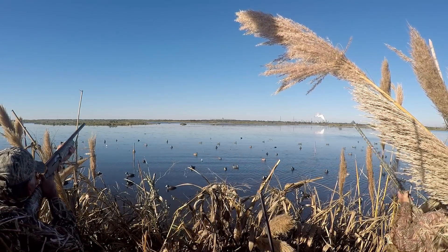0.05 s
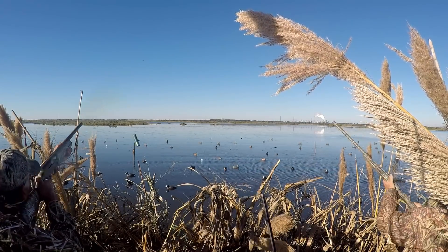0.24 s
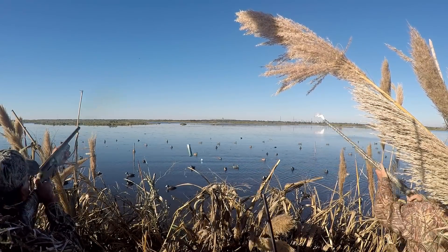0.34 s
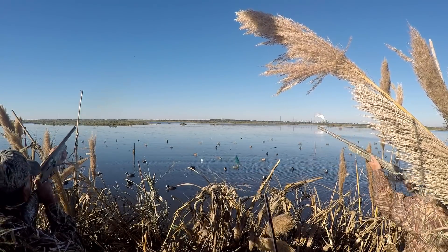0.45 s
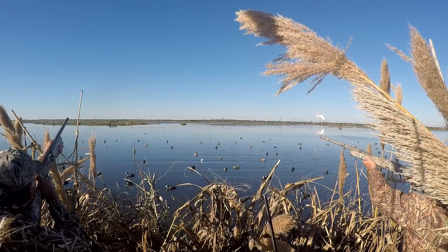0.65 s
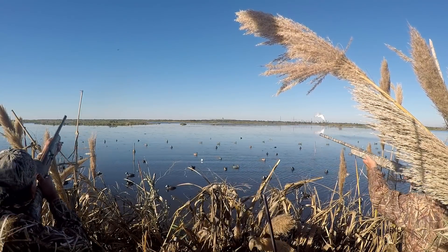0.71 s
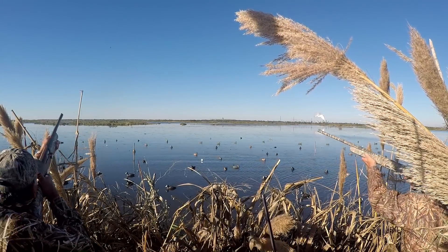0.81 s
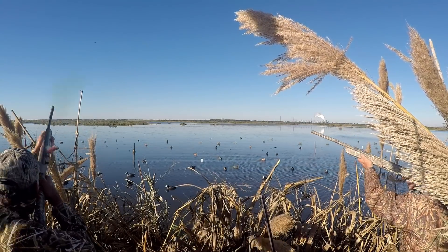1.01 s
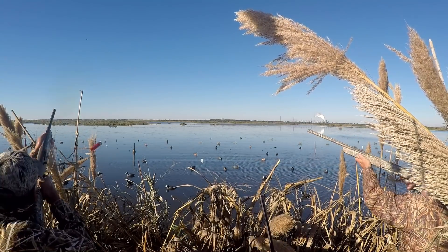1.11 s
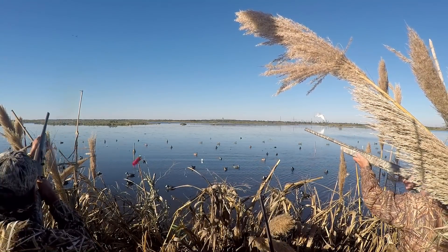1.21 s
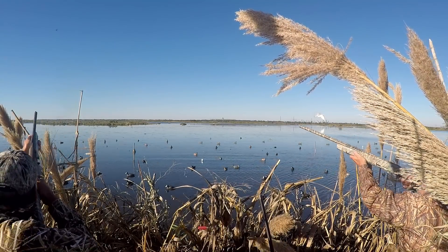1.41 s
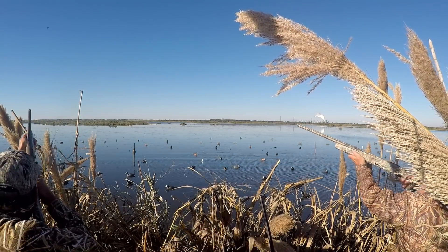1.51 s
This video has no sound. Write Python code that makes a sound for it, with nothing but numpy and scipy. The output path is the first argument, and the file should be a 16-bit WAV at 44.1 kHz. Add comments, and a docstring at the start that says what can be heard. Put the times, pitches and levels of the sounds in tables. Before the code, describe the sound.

Two shotgun blasts, close and overloading a small housed microphone in marsh reeds. Wind rumble and faint rustle open; at 0.2 s the first sharp crack hits with a short hollow boom and scattered tail. Metallic action clacks rattle at 0.26-0.33 s. Quiet rustle and small knocks lead to the second blast at 1.05 s, a clack and knocks at 1.11-1.18 s, a fading far-bank echo, and a light knock at 1.54 s.

```python
"""Among reeds at the edge of open water, two shotgun blasts go off close to a small camera.
Each is a burst of noise with a forerunner, ringing boom in the housing, one slow low-frequency swing as
the input recovers and fading scatter off reeds, water and far banks; the loud fronts overload the input.
Gun actions clack as short noise bursts, knocks and scrapes are resonant noise, and slow and quick random
level curves shape the wind rumble on the microphone port and the rustle of the reeds."""
import sys
import numpy as np
from scipy import signal
from scipy.fft import rfft, irfft, next_fast_len
from scipy.io import wavfile
from scipy.ndimage import map_coordinates

SR = 44100
rng = np.random.default_rng(int(sys.argv[2]) if len(sys.argv) > 2 else 0)


def inscribe(sig):
    """Save sig as 16-bit PCM at rate SR to the path in sys.argv[1].

    A 1-D sig is mono; a 2-D sig holds one channel per row.
    Samples are clipped to [-1, 1] before scaling.
    """
    pcm = np.round(np.clip(np.atleast_2d(sig).T, -1, 1) * 32767)
    wavfile.write(sys.argv[1], SR, pcm.astype(np.int16))


def ratio(d):
    """dB to gain"""
    e = np.asarray(d, float) / 20
    return 10 ** e


N = 68355  # samples


def unit(x):
    """Scales x to rms 1."""
    return x / np.sqrt(np.mean(x ** 2) + 1e-20)


def along(points, hz):
    """Reads (hz, value) points on a log frequency axis."""
    point_hz, value = np.transpose(points)
    return np.interp(np.log(hz + 1), np.log(point_hz + 1), value)


def curve(tables):
    """One value per sample from joined (time_s, value) tables."""
    time_s, value = np.transpose(np.concatenate(tables))
    return np.interp(np.arange(N) / SR, time_s, value)


def wobble(rate):
    """A smooth random curve through rate normal knots a second."""
    knots = rng.standard_normal(int(N * rate / SR) + 4)
    return map_coordinates(knots, [np.arange(N) * rate / SR])


def filtered(x, response):
    """Multiplies the spectrum of x by a response of frequency in Hz."""
    m = next_fast_len(N + 8192)
    return irfft(rfft(x, m) * response(np.fft.rfftfreq(m, 1 / SR)), m)[..., :N]


def noise(spectrum):
    """Coloured noise of rms 1 from (hz, relative dB per Hz) points."""
    return unit(filtered(rng.standard_normal(N), lambda hz: ratio(along(spectrum, hz))))


def since(s):
    """Seconds after s, zero before."""
    return np.maximum(np.arange(N) / SR - s, 0)


def shape(s, rise, hold, t60):
    """Exponential rise from s; a 60 dB per t60 decay sets in after hold (all in seconds)."""
    return (1 - np.exp(-since(s) / abs(rise))) * ratio(-60 * since(s + hold) / t60)


def wind():
    """Wind on the microphone port: low rumble in slow lumps."""
    # level of the wind rumble as heard, lower after the first blast: time_s, level_db
    wind_levels = [
        [(0, -32), (.03, -34.5), (.06, -39), (.12, -41.5), (.15, -39), (.172, -26.5), (.195, -38.5)],
        [(.27, -46), (.33, -50.5), (.45, -54.5), (.52, -48.5), (.6, -50.5), (.94, -49), (1.02, -39.5)],
        [(1.12, -41), (1.2, -52), (1.3, -44), (1.45, -50), (1.525, -42), (1.55, -48.5)],
    ]
    # colour of the rumble: hz, relative_db_per_hz
    rumble_colour = [(12, -37), (20, -1.5), (41, -0.5), (111, -14), (195, -29), (232, -29), (500, -38),
                     (650, -63.5), (1100, -120)]
    lumpy = unit(ratio(1.5 * wobble(14)) * noise(rumble_colour))
    return ratio(curve(wind_levels)) * lumpy


def reeds():
    """Reeds around the microphone: rustling noise broken into small crackles."""
    # level of the rustle as heard: time_s, level_db (before a common lift of 1.5 dB)
    rustle_levels = [
        [(0, -68), (.03, -69), (.06, -65), (.19, -66), (.4, -72)],
        [(.45, -73), (.52, -82), (.59, -81), (.635, -69), (.655, -79), (.69, -66), (.73, -77), (.79, -70),
         (.846, -68), (.89, -75), (.915, -66), (1.02, -67)],
        [(1.3, -69), (1.334, -76), (1.352, -64), (1.37, -74), (1.43, -68), (1.53, -71)],
    ]
    # colour of the rustle: hz, relative_db_per_hz
    reed_colour = [(180, -39), (300, -9), (424, -3), (640, -14), (742, -11), (1120, -2), (1220, -9.5),
                   (6300, -11), (8900, -19.5), (15300, -28)]
    crackle = ratio(1.5 * wobble(40) + 1.5 * wobble(300))
    return ratio(curve(rustle_levels) + 1.5) * unit(crackle * noise(reed_colour))


def knocks():
    """Dull knocks and scrapes: noise through a squared resonance, risen and damped."""
    # start_s, level_db, centre_hz, width_hz (of the resonance before squaring), rise_s, t60_s
    knock_events = [(0.618, -57, 450, 900, 0.0039, 0.031), (.668, -62.5, 2750, 1200, 0.024, 0.18),
                    (.951, -53.5, 2680, 1486, 0.003, 0.091), (0.952, -53.5, 561, 900, 0.023, 0.56),
                    (.983, -47.5, 690, 239.4, 0.017, 0.17), (1.001, -41, 347, 166, .012, .15),
                    (1.117, -31, 190, 110, 0.0034, 0.04), (1.129, -38.5, 700, 990, 0.0095, 0.11),
                    (1.152, -37.5, 197, 111, .004, .06), (1.541, -50.5, 2794, 698, 0.00074, 0.037),
                    (1.539, -45.5, 5990, 3500, 0.001002, 0.05), (1.544, -36.5, 441, 201.7, 0.0053, 0.1)]
    mix = np.zeros(N)
    for start_s, level_db, centre_hz, width_hz, rise_s, t60_s in knock_events:
        def resonance(hz):
            return (hz * width_hz / np.hypot(centre_hz ** 2 - hz ** 2, hz * width_hz)) ** 2
        body = unit(filtered(rng.standard_normal(N), resonance))
        mix += ratio(level_db) * body * shape(start_s, rise_s, rise_s, t60_s)
    return mix


def gun_actions():
    """Metal of the gun actions: each clack is a sharp, quickly damped burst of coloured noise."""
    # clacks: start_s, level_db, t60_s
    clack_events = [(0.156, -54, 0.042), (0.263, -31.5, 0.025), (0.276, -34.5, .015), (0.283, -35.5, .02),
                    (0.299, -38, 0.023), (0.31, -34.5, .02), (0.33, -30.5, 0.055), (1.114, -24, .015),
                    (1.18, -40.5, 0.054)]
    # colour of the metal: hz, relative_db_per_hz
    metal_colour = [(88, -43), (150, 2), (387, -6.5), (1000, -9), (1440, -20), (2170, -10.5), (3590, -16.5),
                    (5710, -19), (15300, -41.5)]
    mix = np.zeros(N)
    for start_s, level_db, t60_s in clack_events:
        mix += ratio(level_db) * noise(metal_colour) * shape(start_s, 0.00024, 0.00035, t60_s)
    return mix


def far_banks(s):
    """Far banks answer as slowly swelling, lumpy noise of long decay."""
    # colour of the far answer: hz, relative_db_per_hz
    far_colour = [(700, -31), (1500, -9), (2300, -1), (3100, 1), (3900, -12.5), (5300, -6.5), (8000, -20),
                  (12000, -39)]
    swell_s, t60_s = 0.07, 0.4
    return noise(far_colour) * shape(s, swell_s, swell_s, t60_s) * ratio(2.5 * wobble(90))


def scatter(s, t60):
    """Reeds and water scatter the blast as lumpy noise whose decay time depends on frequency."""
    # colour at the start: hz, relative_db_per_hz
    scatter_colour = [(50, -39.5), (90, -1.5), (200, 1), (420, -3.5), (650, -10.5), (1050, -14),
                      (1600, -21.5), (2200, -16.5), (3100, -17.5), (5000, -22), (8500, -31.5),
                      (15300, -41.5)]
    # shortening of the decay: hz, share_of_t60
    decay_shares = [(150, 0.8), (2500, 0.94), (7000, 0.73), (13000, 0.75)]
    hz, t, bins = signal.stft(noise(scatter_colour), SR, nperseg=256)
    band_t60 = t60 * along(decay_shares, hz)[:, None]
    fade = ratio(-60 * np.maximum(t - s, 0) / band_t60)
    fading = signal.istft(bins * fade, SR, nperseg=256)[1][:N]
    return fading * (1 - np.exp(-since(s) / 0.004)) * ratio(3 * wobble(260))


def swing(s):
    """One full slow cycle of the recovering input, damped as it goes."""
    swing_hz, lag_s, t60_s = 35, 0.009, 0.22
    late = since(s + lag_s)
    return ratio(-60 * late / t60_s) * np.sin(2 * np.pi * np.minimum(swing_hz * late, 1))


def housing_boom(s):
    """The housing rings in damped low sines, struck by the direct blast and two bounces."""
    # ringing modes: mode_hz, level_db (before the arrival's level), t60_s
    boom_modes = [(100, -11, .06), (147, -3.5, .035), (235, 15, .018), (367, -8, .039), (490, -13, .03)]
    # direct blast and bounces: lag_s after the crack, arrival_db added to each mode
    arrival_list = [(.0011, 2), (.0084, 4.5), (.0142, -5)]
    mix = np.zeros(N)
    for lag_s, arrival_db in arrival_list:
        for mode_hz, level_db, t60_s in boom_modes:
            ring = np.sin(2 * np.pi * mode_hz * since(s + lag_s))
            mix += ratio(level_db + arrival_db) * ring * shape(s + lag_s, 0.0043, 0, t60_s)
    return mix


def forerunner(s):
    """A weak, short noise burst 4.2 ms ahead of the crack."""
    # colour of the forerunner: hz, relative_db_per_hz
    lead_colour = [(300, -17), (900, -2), (2800, -6), (15000, -25)]
    lead_s, lead_db = 0.0042, -19
    return ratio(lead_db) * noise(lead_colour) * shape(s - lead_s, 0.0004, 0.004, 0.02)


def port_ring(s):
    """The microphone port rings at the first front: a damped sine with a wavering phase."""
    ring_hz, ring_db, rise_s, hold_s, t60_s = 2750, -2, 0.0006, 0.002, 0.023
    tone = np.sin(2 * np.pi * ring_hz * since(s) + 0.53 * wobble(700))
    return ratio(ring_db) * tone * shape(s, rise_s, hold_s, t60_s)


def crack(s):
    """Rough noise burst of the blast, a weaker noise shelf under it, held about 33 ms: mid and side."""
    # colour of the crack: hz, relative_db_per_hz
    crack_colour = [(400, -18.5), (700, -8.5), (1100, -1), (1800, -6), (2800, -0.5), (4300, -4.5),
                    (6300, -6), (10000, -15.5), (15400, -14)]
    # part that differs between left and right: hz, db_relative_to_mid
    side_levels = [(60, -50.5), (500, -28), (2500, -28.5), (7000, -18), (14900, -16)]
    shelf_db, shelf_rise_s, shelf_hold_s, shelf_t60_s = -18.5, 0.0011, 0.033, 0.045
    lean_db = -25  # the crack leans to the right
    front = shape(s, 0.0006, 0.005, 0.036)
    shelf = ratio(shelf_db) * shape(s, shelf_rise_s, shelf_hold_s, shelf_t60_s)
    burst = (front + shelf) * ratio(2.5 * wobble(350))
    mid = noise(crack_colour) * burst + port_ring(s)
    unlike = filtered(noise(crack_colour), lambda hz: ratio(along(side_levels, hz)))
    side = unlike * burst - ratio(lean_db) * mid
    return mid, side


def shots():
    """Adds the parts of each nearby blast, from the far answer to the crack: mid and side."""
    # blasts: start_s, crack_db, scatter_db, scatter_t60_s (before its shares by frequency), swing_db, far_db
    blasts = [(0.204, -5.5, -20.5, 0.35, -10.5, -47), (1.0539, -6, -21.5, 0.4, -12.5, -42.5)]
    mid, side = np.zeros((2, N))
    for start_s, crack_db, scatter_db, scatter_t60_s, swing_db, far_db in blasts:
        mid += ratio(far_db) * far_banks(start_s)
        mid += ratio(scatter_db) * scatter(start_s, scatter_t60_s)
        mid += ratio(swing_db) * swing(start_s)
        mid += housing_boom(start_s)
        mid += ratio(crack_db) * forerunner(start_s)
        crack_mid, crack_side = crack(start_s)
        mid += ratio(crack_db) * crack_mid
        side += ratio(crack_db) * crack_side
    return mid, side


def scene():
    """One microphone port in effect; only the cracks differ a little from left to right."""
    background = wind() + reeds() + knocks() + gun_actions()
    mid, side = shots()
    mid = mid + background
    return np.array([mid + side, mid - side])


def roll_off(x):
    """The treble ends steeply here."""
    return signal.sosfilt(signal.butter(12, 15470, fs=SR, output="sos"), x)


def record(dry):
    """The input overloads towards a smooth ceiling, then the treble slopes off to its upper limit."""
    ceiling, hardness = 0.98, 5
    top_hz, edge_hz = 15550, 400  # silent from top_hz up, sloping over edge_hz below it
    overloaded = dry / (1 + np.abs(dry / ceiling) ** hardness) ** (1 / hardness)
    mix = filtered(overloaded, lambda hz: np.clip((top_hz - hz) / edge_hz, 0, 1))
    return roll_off(mix)


dry = scene()
out = record(dry)
inscribe(out)
```